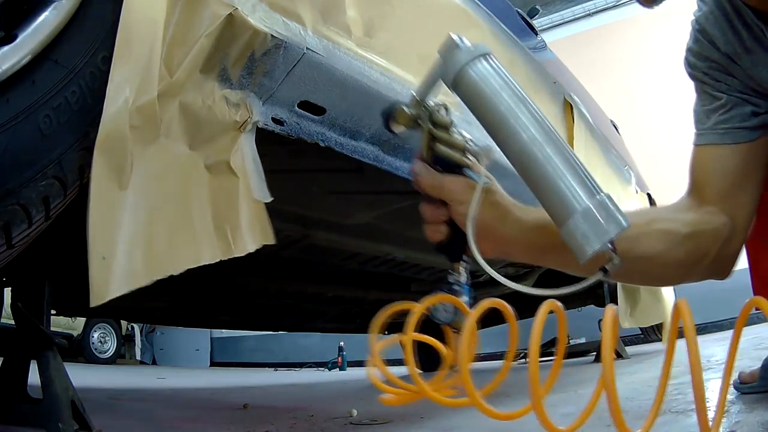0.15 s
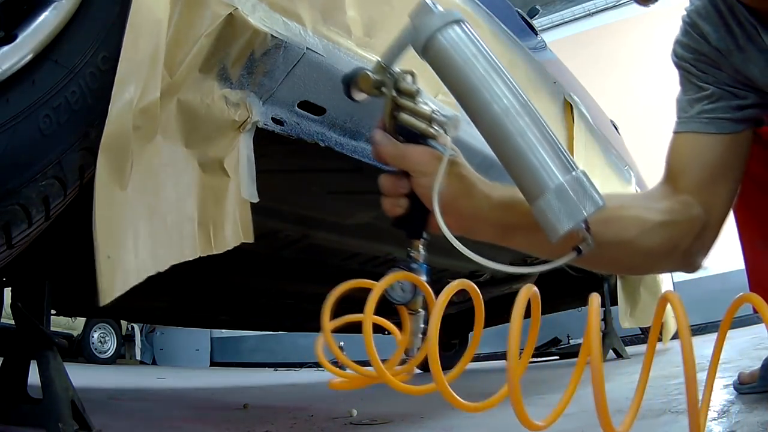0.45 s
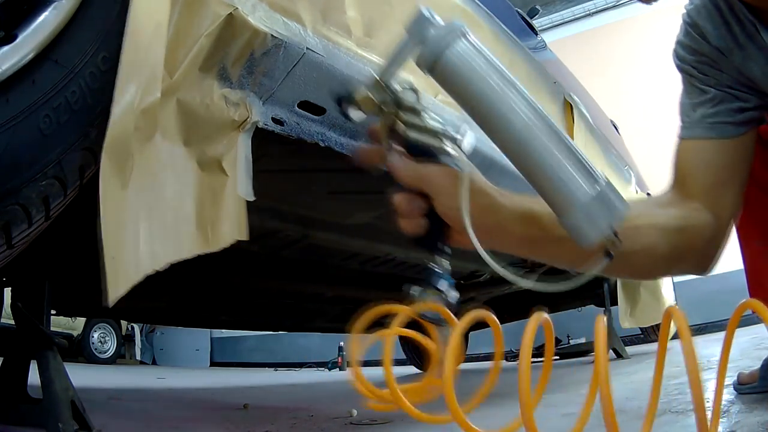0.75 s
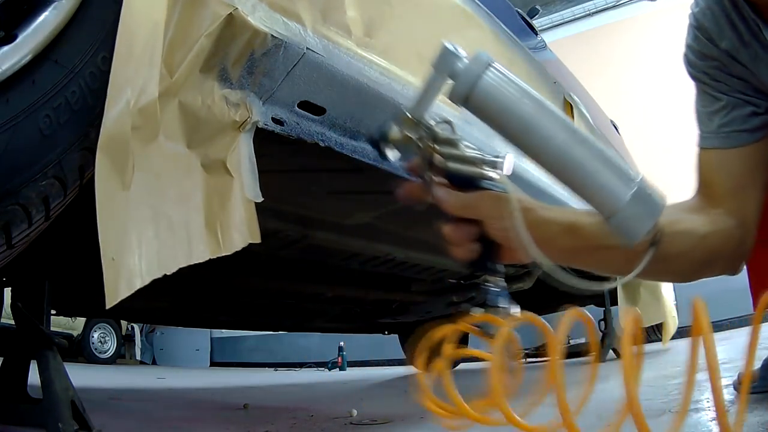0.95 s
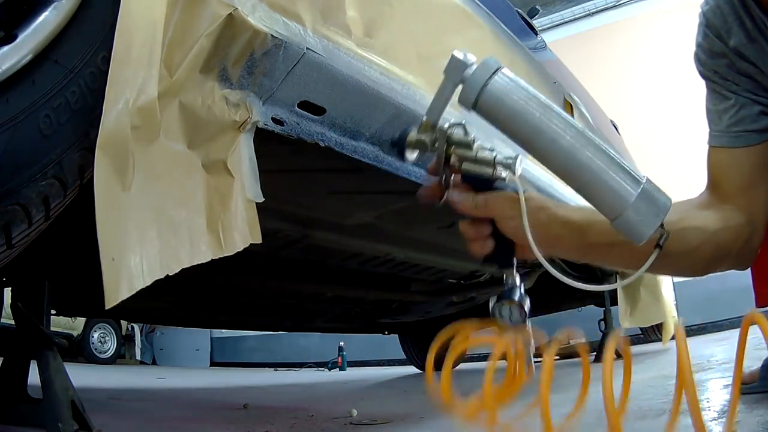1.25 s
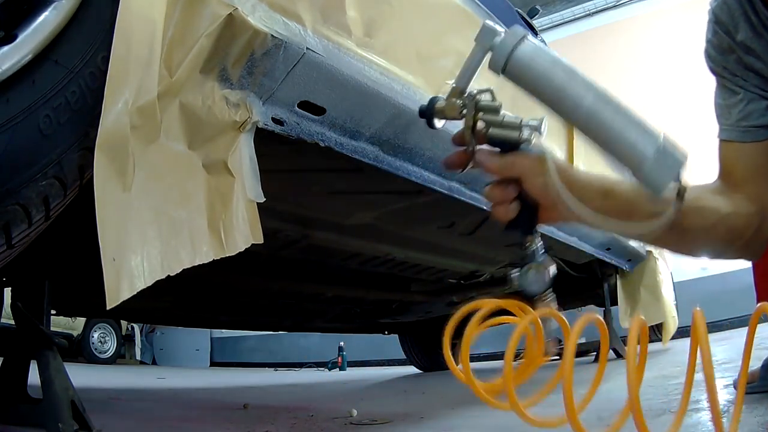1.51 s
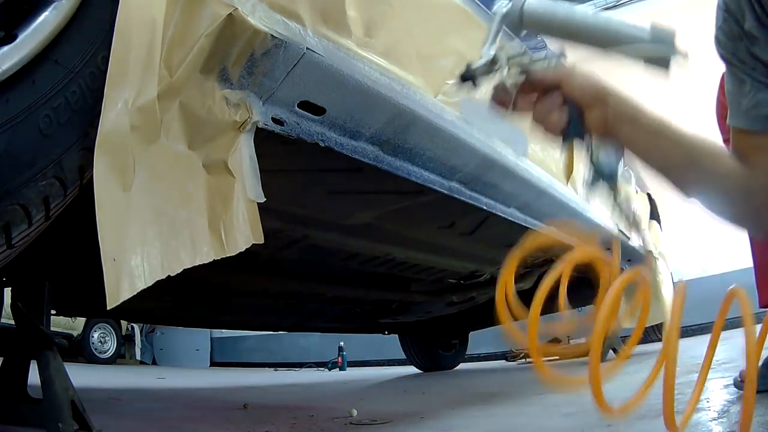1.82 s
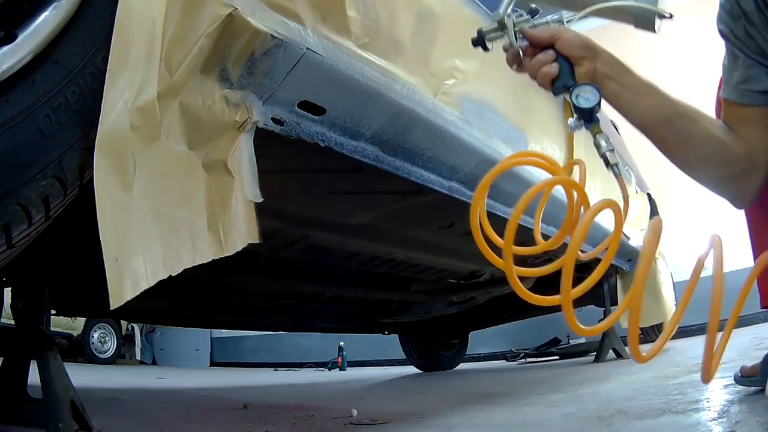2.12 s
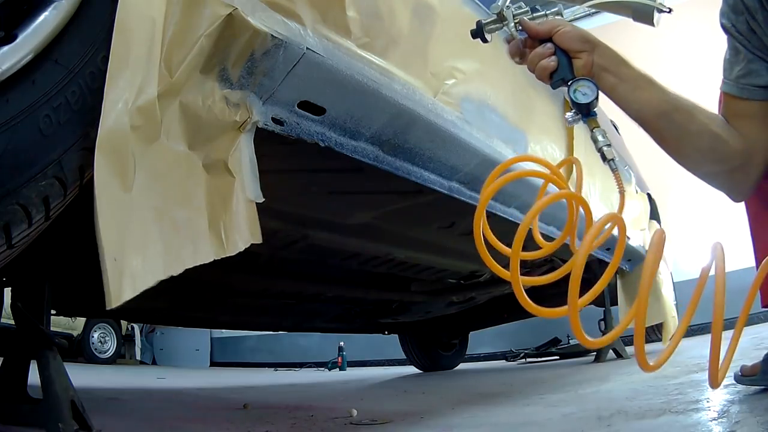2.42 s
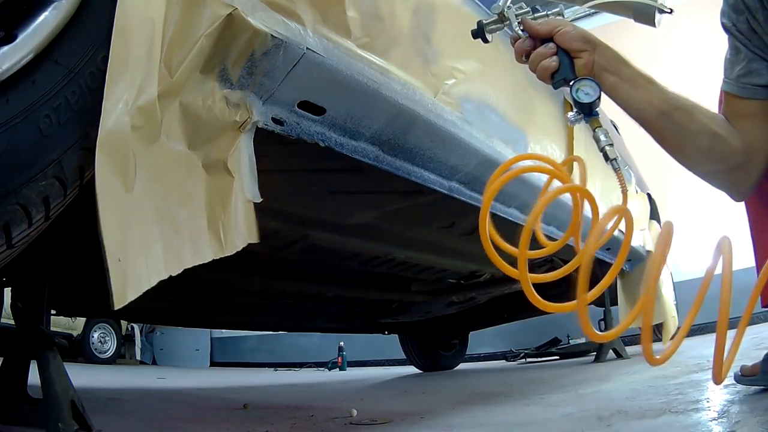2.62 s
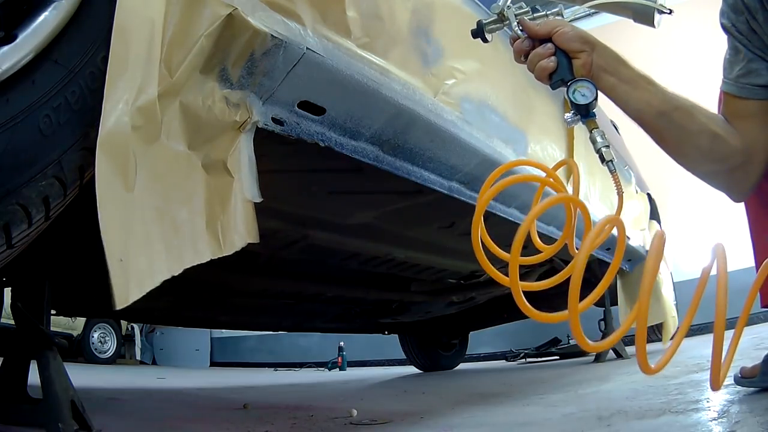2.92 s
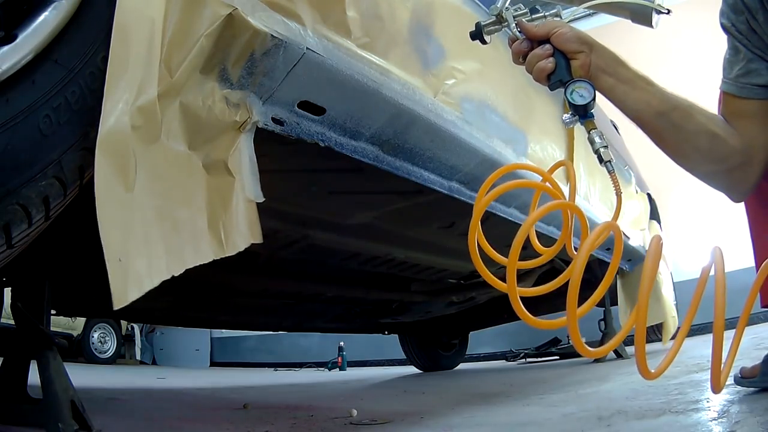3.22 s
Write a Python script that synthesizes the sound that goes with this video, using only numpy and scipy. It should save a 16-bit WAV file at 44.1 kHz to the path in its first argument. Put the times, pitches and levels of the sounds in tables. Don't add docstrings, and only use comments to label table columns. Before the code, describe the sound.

Compressed-air spray gun: loud hollow hiss, fading leak of air, then a second steady hiss.

```python
import sys
import numpy as np
from scipy import signal
from scipy.fft import rfft, irfft
from scipy.io import wavfile
from scipy.ndimage import uniform_filter1d, map_coordinates

SR = 44100
rng = np.random.default_rng(int(sys.argv[2]) if len(sys.argv) > 2 else 0)


def bounce(signal):
    frames = np.transpose(np.atleast_2d(signal))
    limited = np.clip(frames, -1, 1)
    pcm = np.round(limited * 32767).astype(np.int16)
    wavfile.write(sys.argv[1], SR, pcm)


def rack_gain(trim_db):
    fader = np.asarray(trim_db, float)
    return 10 ** (fader / 20)


N = 147735

SHUT_S, SHUT_FALL_S = 0.5864, 0.0048
OPEN_S, OPEN_RISE_S = 1.926, 0.0039
EDGE_HZ = 60
STEADY_PATCHY_DB = 0.4

# centre in Hz, width in Hz, gain in dB, time in seconds, duration in seconds.
JET_PASSING = [(2330, 890, 1.5, .1, 0.25), (2410, 900, -4, 0.37, .2), (3200, 500, -3.5, 0.38, 0.27),
               (6100, 200, 4.5, .15, .3), (9050, 250, 2.5, 0.11, .3), (13600, 1200, -2.5, .3, .6),
               (7600, 400, 2.5, 2.1, 0.26), (9300, 700, 5.5, 2.22, 0.43), (10800, 700, 4.5, 2.13, 0.36),
               (1450, 350, 2.5, 2.57, 0.25), (13800, 400, -4, 2.7, 0.73), (14700, 800, 3, 2.7, .6),
               (15300, 500, -4, 2.7, .6), (8700, 300, -5, 3.1, 0.44), (7700, 700, 2, 3.2, .3),
               (1000, 700, -1.5, 3.25, 0.26), (4300, 1400, -2, 2.04, .2), (10800, 900, 2.5, 2.85, .4)]


def unit(x):
    return x / np.sqrt(np.mean(x ** 2) + 1e-20)


def along(points, hz):
    f, v = np.transpose(points)
    return np.interp(np.log(hz + 1), np.log(f + 1), v)


def at_time(points, t):
    s, v = np.transpose(points)
    return np.interp(t, s, v)


def wobble(rate_hz):
    knots = rng.standard_normal(int(N * rate_hz / SR) + 4)
    return map_coordinates(knots, [np.arange(N) * rate_hz / SR])


def step(t, at_s, takes_s):
    return 1 / (1 + np.exp(np.clip((at_s - t) / takes_s, -60, 60)))


def band(x, low_hz, high_hz):
    hz = np.fft.rfftfreq(x.shape[-1], 1 / SR)
    inside = np.clip(np.minimum(hz - low_hz, high_hz - hz) / EDGE_HZ + 0.5, 0, 1)
    return irfft(rfft(x) * np.sin(np.pi / 2 * inside) ** 2, x.shape[-1])


def passing(rows):
    def law_db(hz, t):
        total_db = 0
        for centre_hz, width_hz, db, s, long_s in rows:
            off = ((hz - centre_hz) / width_hz * 2) ** 2 + ((t - s) / long_s * 2) ** 2
            total_db = total_db + db * np.exp(-off)
        return total_db
    return law_db


def rush(spectrum, bands=(), bands_db=0, patchy_db=1.5, streaks_db=0.9, law_db=lambda hz, t: 0):
    hz, t, z = signal.stft(rng.standard_normal(N), SR, nperseg=1024)
    power = rack_gain(along(spectrum, hz)) ** 2
    for centre_hz, width_hz, db in bands:
        power = power + rack_gain(db + bands_db) ** 2 / (1 + (2 * (hz - centre_hz) / width_hz) ** 2)

    def field(bins, frames):
        rough = uniform_filter1d(rng.standard_normal(z.shape), bins, axis=0)
        return unit(uniform_filter1d(rough, frames, axis=1))

    chance_db = patchy_db * field(9, 6) + streaks_db * field(5, 16)
    gain = np.sqrt(power / power.mean())[:, None] * rack_gain(chance_db + law_db(hz[:, None], t))
    return signal.istft(z * gain, SR, nperseg=1024)[1][:N]


def first_burst(t):
    # time in seconds, level in dB.
    hiss_db = [(0.0, -27.5), (0.128, -27.5), (0.448, -24), (0.57, -24.5)]
    roar_db = [(0, -33), (.05, -28), (.105, -22), (.175, -18), (.24, -24), (.3, -29), (.4, -26.5),
               (.46, -21.5), (.5, -24), (.54, -32.5)]
    boom_db = [(0, -32), (.16, -31.5), (.3, -41), (.45, -42), (.57, -46)]
    # frequency in Hz, density in dB per Hz.
    hiss_air = [(710, -25), (1200, -1), (1410, -11.5), (2630, -7), (2990, -13.5), (6400, -8), (15600, -20)]
    roar_dull = [(40, -58), (110, -32), (160, -19), (290, -16), (400, -3), (800, -1), (1250, -11),
                 (1500, -21), (4000, -50)]
    roar_bright = [(40, -48), (170, -19), (400, -19), (520, -3), (850, -1), (1700, -8), (2400, -20),
                   (5000, -50)]
    boom_air = [(60, -41), (110, -19.5), (150, 0), (245, 0.5), (300, -7), (400, -40.5)]
    # centre in Hz, width in Hz, level in dB.
    echoes = [(2500, 1600, -6), (4100, 480, -8), (5160, 400, -5), (6200, 650, -6.5), (7300, 690, -12.5),
              (8980, 550, -4.5), (11840, 1300, -6), (14850, 1200, -8)]

    bright = np.exp(-((t - 0.478) / 0.06) ** 2)
    roar = np.sqrt(1 - bright) * rush(roar_dull, patchy_db=0.5)
    roar += np.sqrt(bright) * rush(roar_bright, patchy_db=STEADY_PATCHY_DB)
    roar *= rack_gain(at_time(roar_db, t) + 0.63 + 0.81 * wobble(91))
    hiss = rush(hiss_air, echoes, bands_db=-4.5, patchy_db=-0.2, law_db=passing(JET_PASSING))
    hiss *= rack_gain(at_time(hiss_db, t) + 0.44 * wobble(22))
    boom = rush(boom_air) * rack_gain(at_time(boom_db, t))
    return (hiss + boom + roar) * (1 - step(t, SHUT_S, SHUT_FALL_S / 2))


def walls(x):
    # frequency in Hz, t60 in seconds.
    decay = [(150, 0.81), (800, 0.61), (4000, 0.29), (12000, 0.1)]
    hz, t, z = signal.stft(rng.standard_normal(SR // 2), SR, nperseg=256)
    fall = rack_gain(-60 * t / along(decay, hz)[:, None])
    tail = signal.istft(z * fall, SR, nperseg=256)[1]
    return rack_gain(-17.5) * signal.fftconvolve(x, tail / np.linalg.norm(tail))[:N]


def room_tone():
    # frequency in Hz, density in dB per Hz.
    shop_air = [(30, 0), (80, -9), (200, -11.5), (330, -15.5), (700, -16.5), (1500, -23), (2300, -29.5),
                (8000, -38), (13000, -42)]
    # centre in Hz, width in Hz, level in dB.
    shop_bands = [(480, 45, -9), (1500, 220, -19.5), (4000, 200, -28)]
    air = rush(shop_air, shop_bands, patchy_db=STEADY_PATCHY_DB, streaks_db=0)
    return rack_gain(-64.5) * band(air, -EDGE_HZ, 12700)


def bleed(t):
    # time in seconds, pressure in dB.
    pressure_db = [(.6, 1), (.9, -4.5), (1.15, -9), (1.35, -15.5), (1.6, -27), (1.75, -42.5), (1.92, -60)]
    # frequency in Hz, density in dB per Hz.
    leak_air = [(35, -58), (60, -9), (102, -0.5), (444, -9), (600, -3), (1750, -7.5), (5740, -3.5),
                (15600, -9)]
    # centre in Hz, width in Hz, level in dB.
    leak_bands = [(1200, 260, 0.5), (1750, 180, -10), (2700, 220, -3), (3300, 200, -15), (4030, 340, 1),
                  (4300, 200, -8), (5300, 400, -10), (6100, 140, 1.5), (7240, 300, -9), (9200, 300, 4.5),
                  (10000, 300, -8), (11800, 900, 1)]
    # frequency in Hz, fall in dB per pressure dB.
    follows = [(300, 2), (700, 0.93), (1700, 0.9), (2500, 1), (3900, 0.79), (6500, 1.35), (10000, 1.82),
               (15000, 2.5)]
    # centre in Hz, width in Hz, extra fall in dB per pressure dB.
    notches = [(2020, 220, .55), (2950, 300, .15), (4850, 250, .3), (6600, 300, .15), (8400, 500, .25)]
    # centre in Hz, width in Hz, gain in dB, time in seconds, duration in seconds.
    reflections = [(13900, 900, -6, .72, .35), (6700, 420, 2, 0.81, .3), (10300, 300, -9, .74, .3),
                   (2750, 400, 7, .97, .3), (3230, 250, 0.5, 0.88, .3), (3900, 390, 4.5, 1.2, 0.57),
                   (4400, 250, 8, 1.3, .4), (2950, 250, -8, 1.2, 0.54), (3300, 370, 8, 1.42, 0.25),
                   (5400, 700, -1, 1.5, .3), (8200, 700, -1, 1.22, .3), (900, 460, 5.5, 1.4, .3),
                   (9300, 350, 5, 0.84, .25), (12000, 600, 3, .75, .3), (1700, 330, 9, 1.53, .3),
                   (4050, 300, 5, 1.8, .3), (2040, 250, 0, 1.05, 0.37), (2500, 500, 1.5, 1.4, .4),
                   (14500, 3000, -6, 1.1, .4)]

    def law_db(hz, s):
        slope = along(follows, hz)
        for centre_hz, width_hz, extra in notches:
            slope = slope + extra * np.exp(-((hz - centre_hz) / width_hz * 2) ** 2)
        return slope * at_time(pressure_db, s) + passing(reflections)(hz, s)

    air = rush(leak_air, leak_bands, bands_db=-9.5, patchy_db=STEADY_PATCHY_DB, streaks_db=1.9, law_db=law_db)
    return rack_gain(-40.5 + 0.67 * wobble(8.8)) * air * step(t, SHUT_S, SHUT_FALL_S / 2)


def thuds(t):
    # time in seconds, level in dB (the pulse peaks about 13 dB lower), length in seconds.
    pushes = [
        (1.23, -56, .005),
        (1.275, -60, .003),
        (1.922, -30, 0.0046),
    ]
    out = np.zeros(N)
    for s, db, long_s in pushes:
        x = (t - s) / long_s
        out += rack_gain(db) * x * np.exp(-(x * 2) ** 2)
    return out


def knocks():
    # time in seconds, peak in dB, tick in dB.
    hits = [
        (1.694, -42.5, -19),
        (1.724, -59.5, -10),
    ]
    # frequency in Hz, level in dB, t60 in seconds.
    modes = [(438, 5, 0.022), (3820, -27, 0.044), (4060, -25, 0.043), (4850, -33, .025), (8500, -38, .02)]
    rise_s = 0.004
    out, t = np.zeros(N), np.arange(SR // 10) / SR
    for s, db, tick_db in hits:
        ring = sum(rack_gain(level - 60 * t / t60) * np.sin(2 * np.pi * hz * t) for hz, level, t60 in modes)
        ring = ring * (1 - np.exp(-t / rise_s)) ** 2
        tick = rack_gain(tick_db - 9 - 60 * t / 0.011) * band(rng.standard_normal(len(t)), 3000, 9600)
        start = round((s - rise_s / 2) * SR)
        out[start:][:len(t)] += rack_gain(db + 11) * (ring + tick)
    return out


def second_burst(t):
    # time in seconds, level in dB.
    hiss_db = [(1.97, -24.5), (3.188, -21), (3.35, -23)]
    # frequency in Hz, density in dB per Hz.
    away_air = [(24, -63), (40, -51.5), (820, -5), (2460, -7.5), (7200, -1), (8570, -9.5), (13100, -10),
                (15600, -10)]
    turned_air = [(24, -62), (40, -56), (388, -13), (564, -1.5), (1420, -2), (2460, -7.5), (7380, -7),
                  (15600, -9)]
    puff_air = [(400, -32), (600, -4), (800, 2), (1100, -6), (1500, -6), (2000, -32)]
    # centre in Hz, width in Hz, level in dB.
    away_echoes = [(765, 116, 0), (2750, 140, -5), (3540, 160, -17), (4730, 80, -17), (7000, 500, -2.5),
                   (4050, 170, -18), (10100, 190, -4.5), (10850, 620, -9), (12900, 330, -1.5),
                   (14600, 130, -7), (15140, 220, -16)]
    turned_echoes = [(1416, 220, -2), (2720, 85, -2), (4490, 610, -4), (6140, 500, 0.5), (7460, 620, 0.5),
                     (9400, 270, -14.5), (11030, 880, -4.5), (11930, 440, -9.5), (12900, 810, -8),
                     (15200, 700, -11)]

    law_db = passing(JET_PASSING)
    turned = step(t, 2.355, 0.14)
    away = rush(away_air, away_echoes, bands_db=-0.5, patchy_db=1.0, law_db=law_db)
    facing = rush(turned_air, turned_echoes, bands_db=1.0, patchy_db=STEADY_PATCHY_DB, law_db=law_db)
    air = np.sqrt(1 - turned) * away + np.sqrt(turned) * facing
    since_s = np.abs(t - OPEN_S)
    kick_db = 5 * np.exp(-since_s / 0.026)
    air *= rack_gain(at_time(hiss_db, t) + kick_db + 0.3 * wobble(9.22) + 0.21 * wobble(300))
    puff = rush(puff_air) * rack_gain(-32.5) * np.exp(-since_s / 0.16)
    return (puff + air) * step(t, OPEN_S, OPEN_RISE_S / 2)


def scene():
    t = np.arange(N) / SR
    near = first_burst(t) + second_burst(t) + thuds(t)
    mono = near + walls(near) + bleed(t) + knocks() + room_tone()
    return np.array([mono, mono])


def side_noise(mono):
    # centre time in seconds, low edge in Hz, high edge in Hz.
    patches = [(0.327, 10500, 12400), (0.768, 4700, 5700), (0.883, 5700, 7600), (1.511, 6300, 6900),
               (2.139, 11000, 12400), (2.187, 5200, 6300), (2.392, 4700, 5700), (2.395, 7500, 9000),
               (2.442, 10300, 12400), (2.741, 11000, 12300), (2.745, 5700, 7600), (2.813, 14500, 15800),
               (2.998, 13800, 15800), (3.233, 5700, 6800), (3.299, 4200, 5200)]
    long_s = 2048 / SR
    side, t = np.zeros(N), np.arange(N) / SR
    for s, low_hz, high_hz in patches:
        frame = np.cos(np.pi * np.clip((t - s) / long_s, -0.5, 0.5)) ** 2
        part = band(mono, low_hz, high_hz)
        noise = unit(band(rng.standard_normal(N), low_hz, high_hz))
        level = np.sqrt(np.sum((part * frame) ** 2) / np.sum(frame ** 2))
        side += rack_gain(-2) * level * frame * noise
    return side


def top_cut(x):
    return signal.sosfilt(signal.butter(12, 16660, fs=SR, output="sos"), x)


def record(dry):
    mono = signal.lfilter(*signal.butter(2, 86, "high", fs=SR), dry[0])
    clip_top = 0.6
    mono = mono / (1 + (mono / clip_top) ** 4) ** (1 / 4)
    side = side_noise(mono)
    mix = band(np.array([mono + side, mono - side]), -EDGE_HZ, 15780)
    return top_cut(mix)


dry = scene()
out = record(dry)
bounce(out)
```